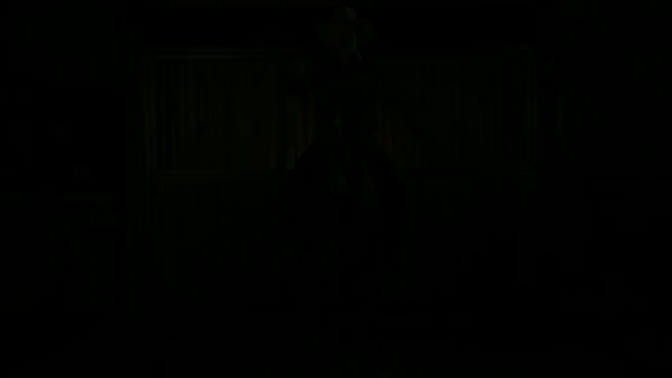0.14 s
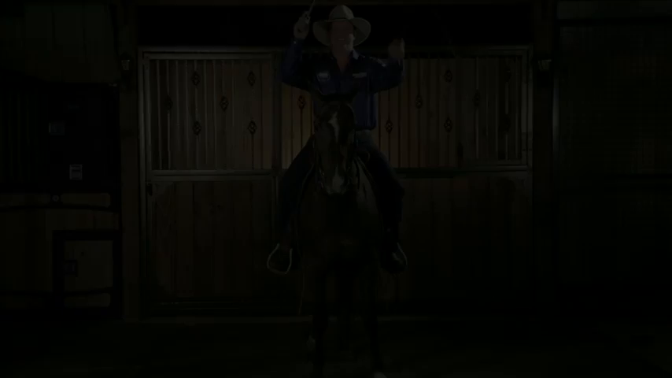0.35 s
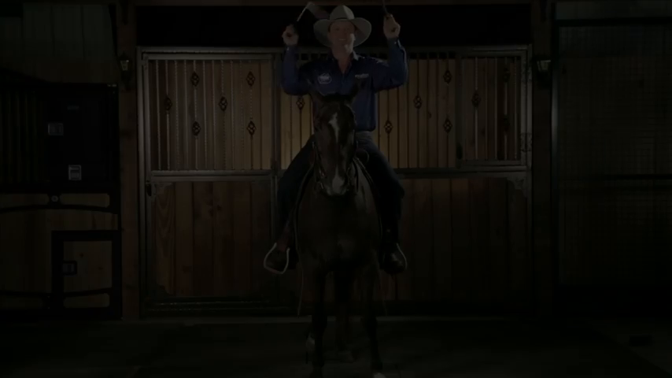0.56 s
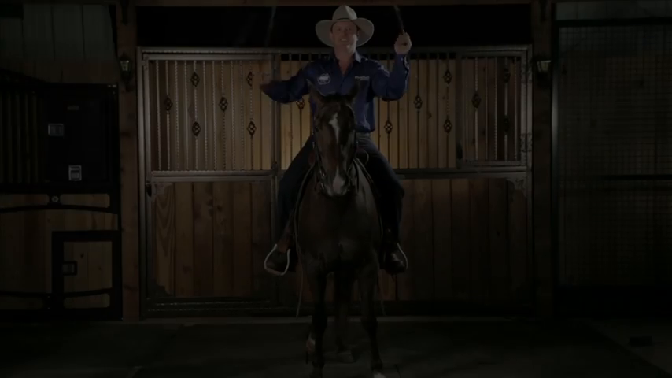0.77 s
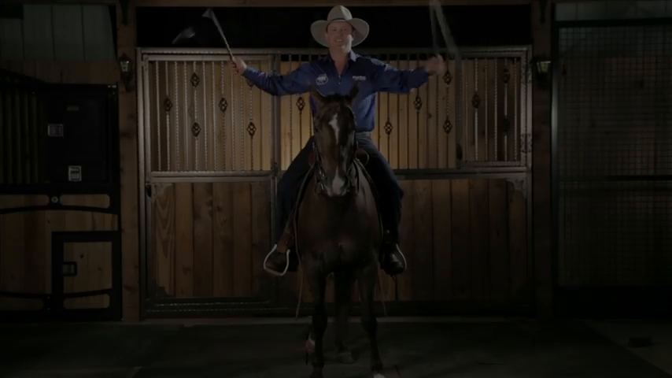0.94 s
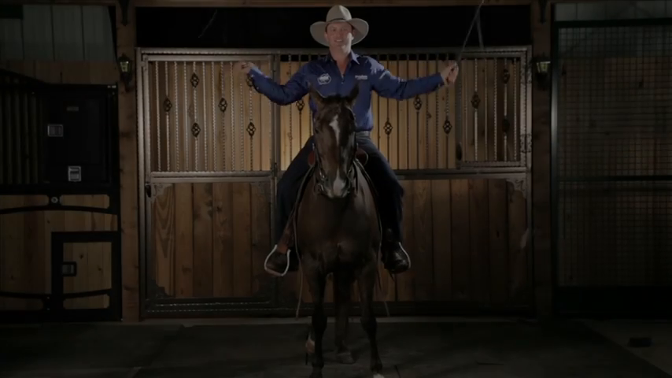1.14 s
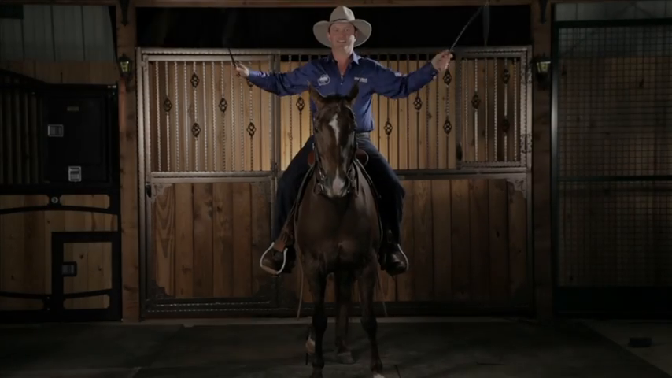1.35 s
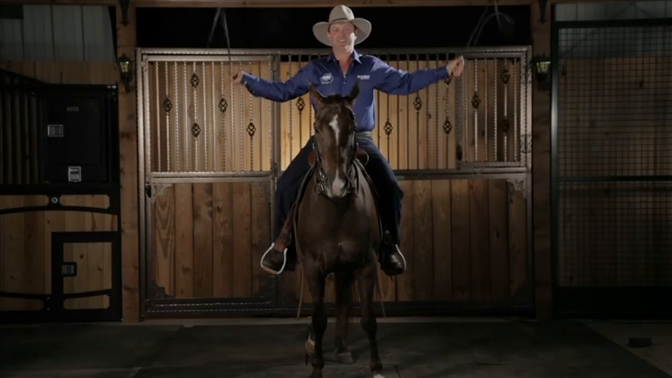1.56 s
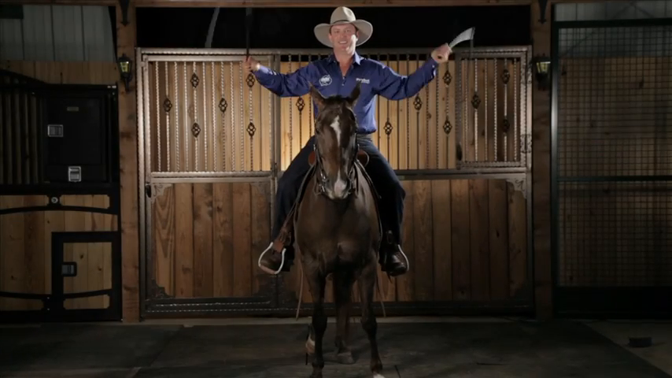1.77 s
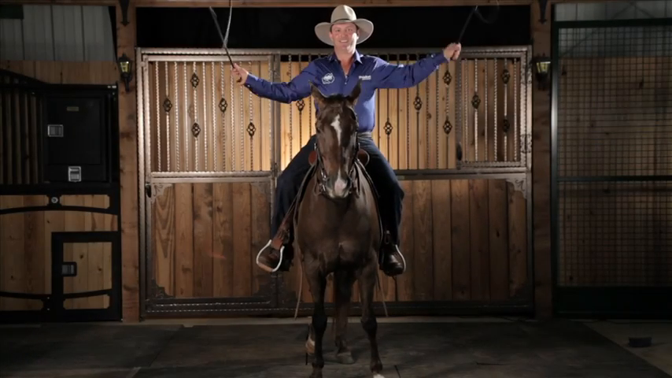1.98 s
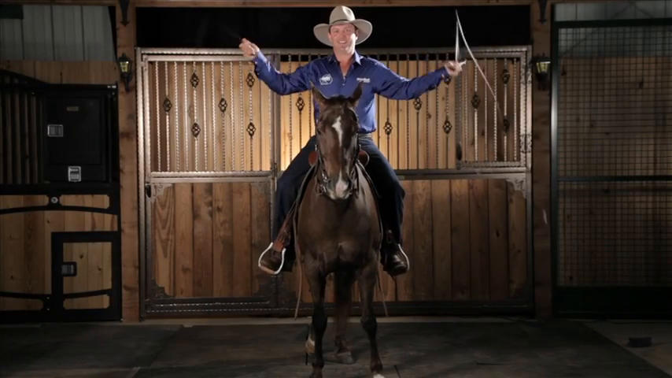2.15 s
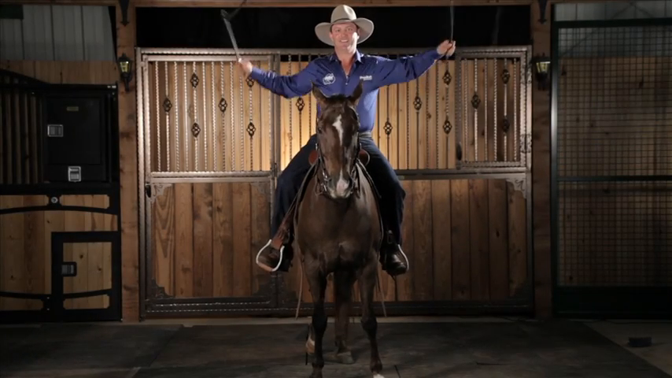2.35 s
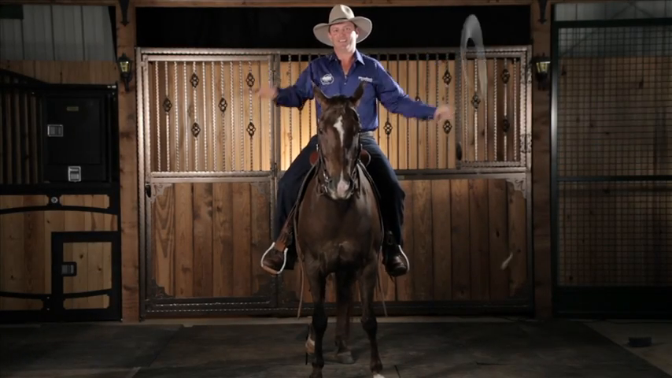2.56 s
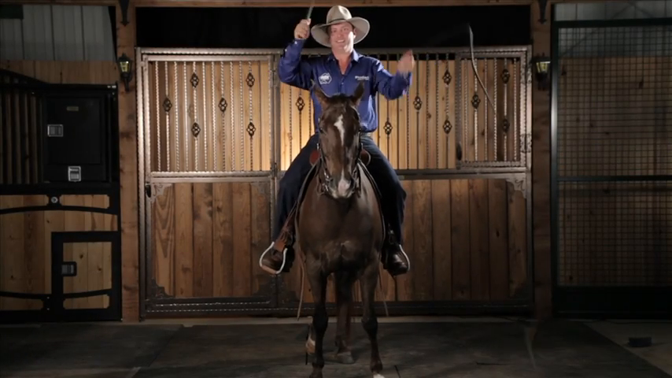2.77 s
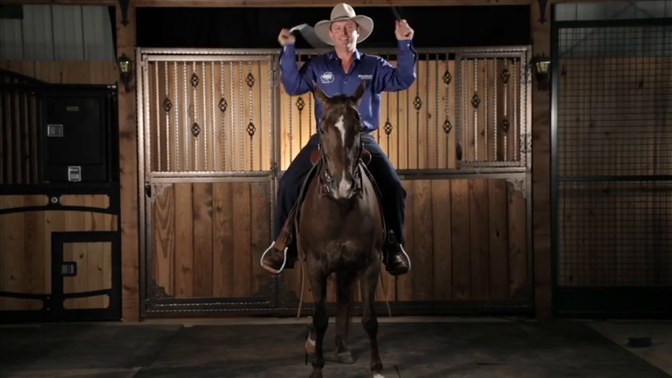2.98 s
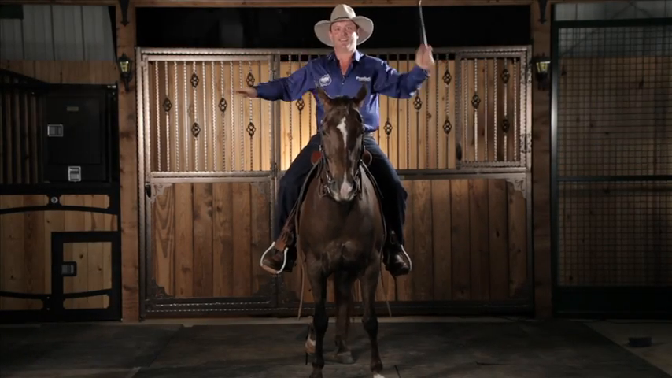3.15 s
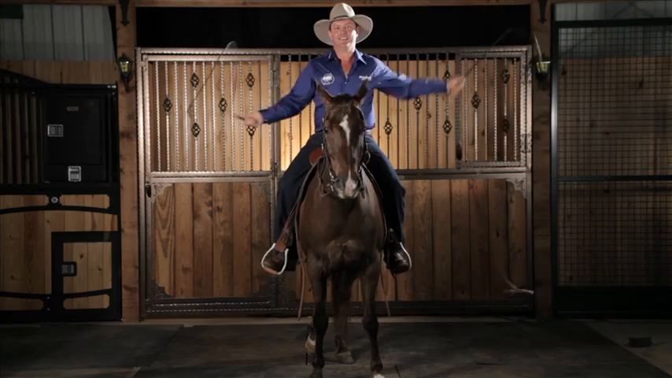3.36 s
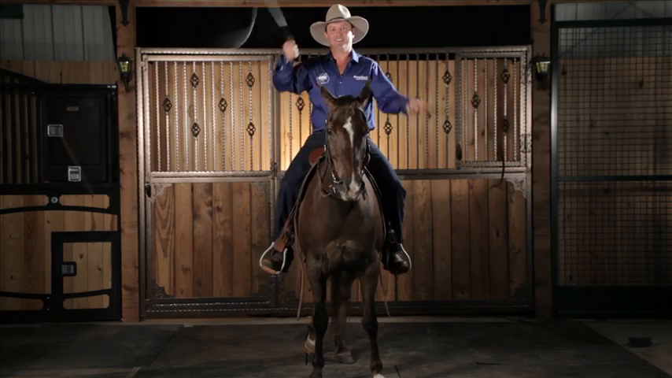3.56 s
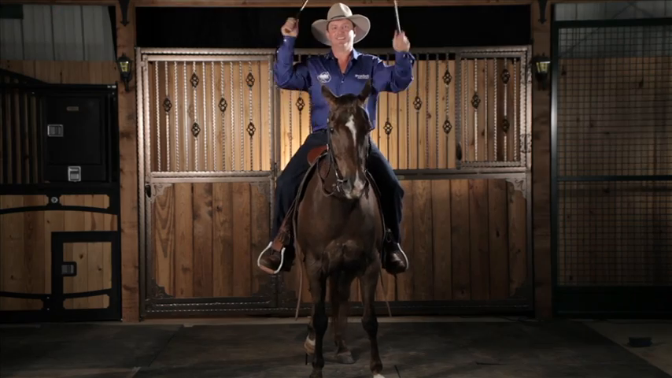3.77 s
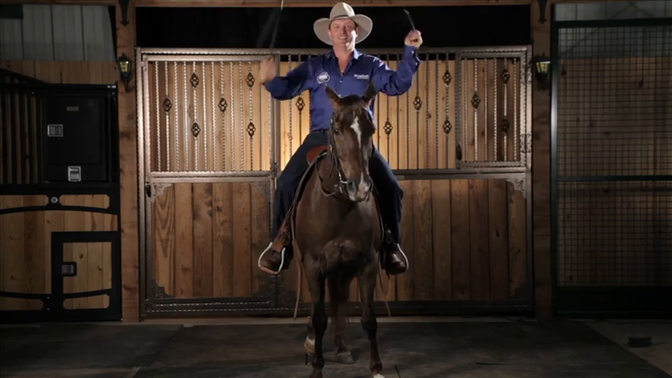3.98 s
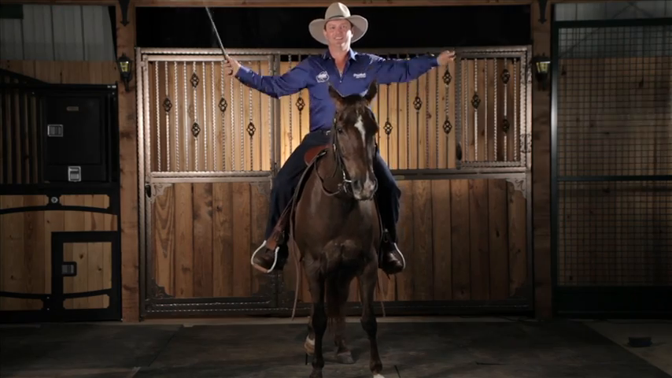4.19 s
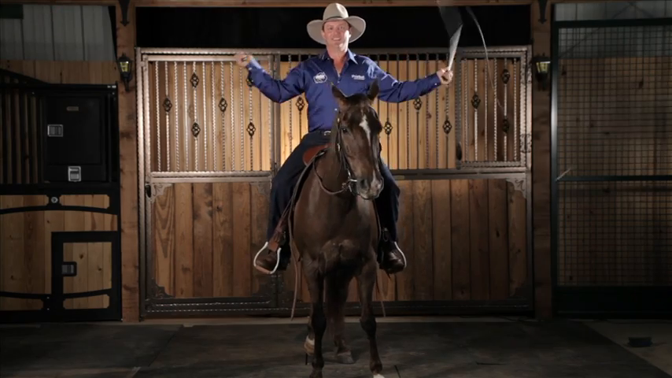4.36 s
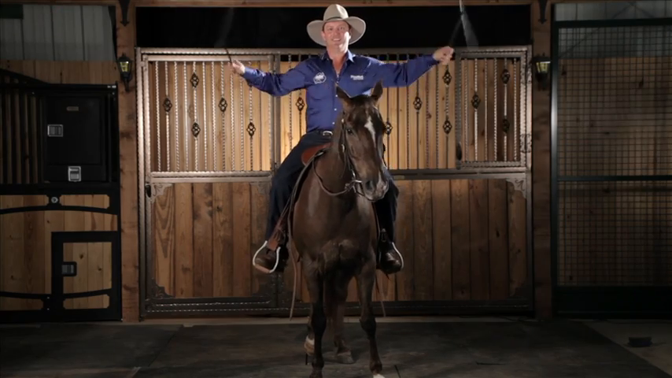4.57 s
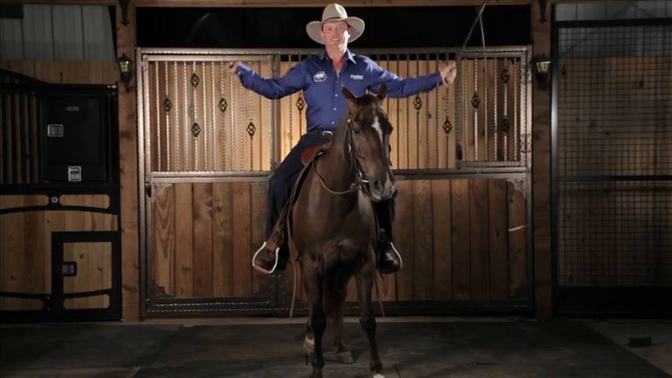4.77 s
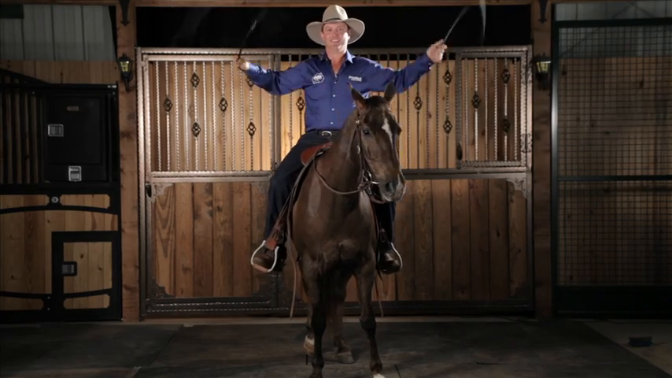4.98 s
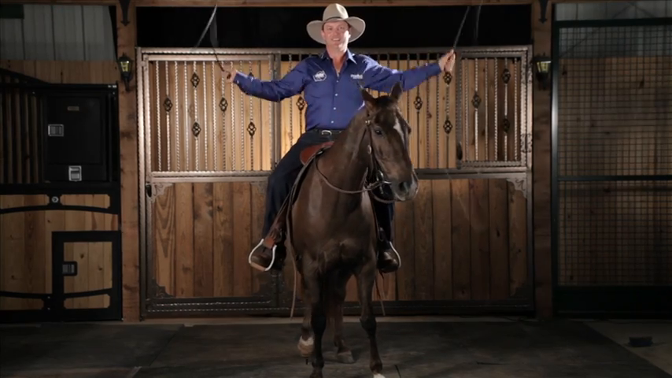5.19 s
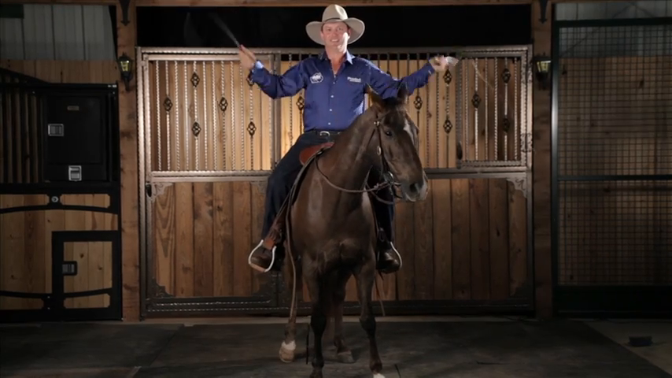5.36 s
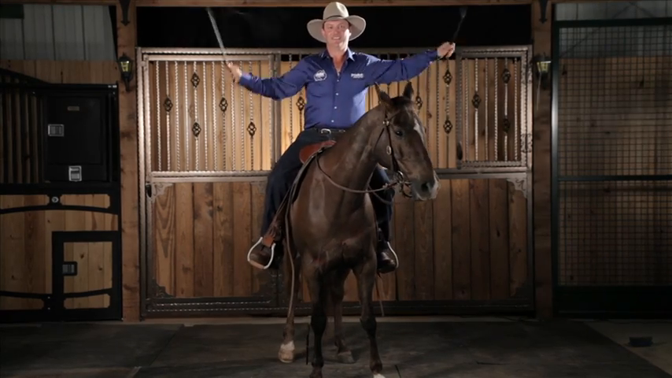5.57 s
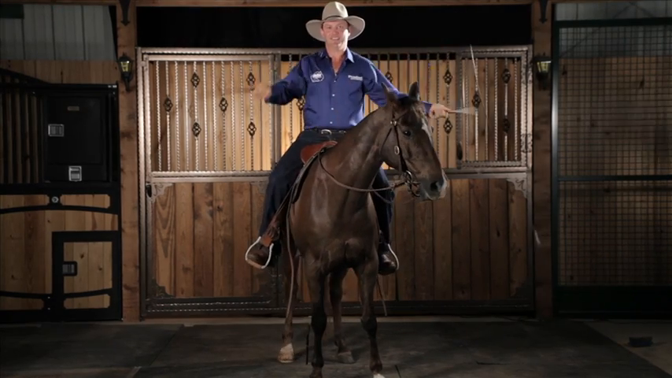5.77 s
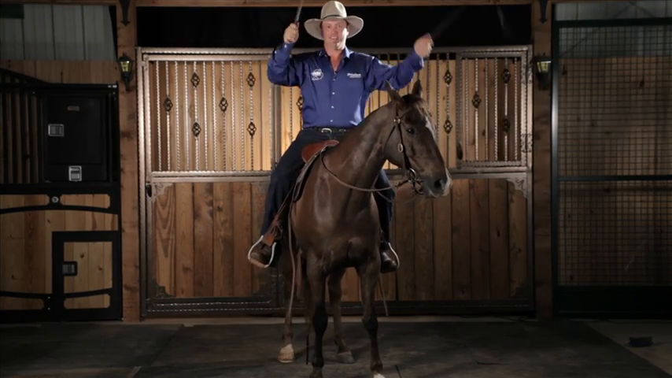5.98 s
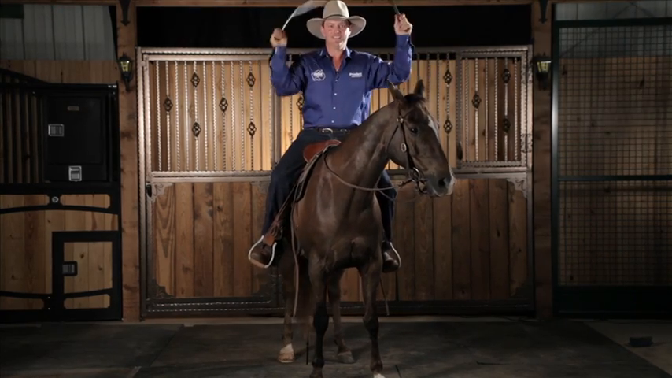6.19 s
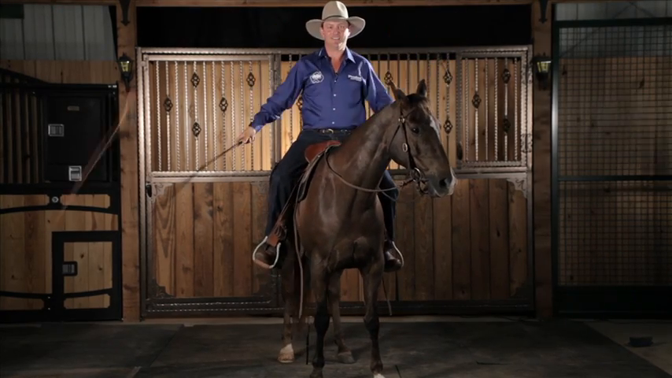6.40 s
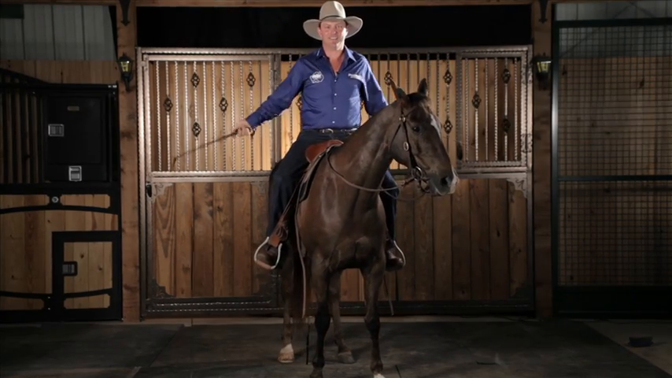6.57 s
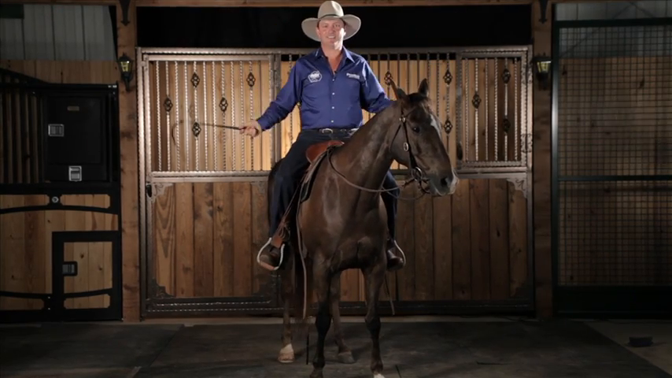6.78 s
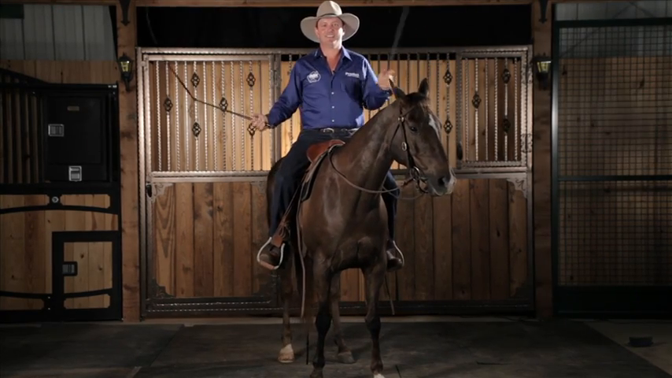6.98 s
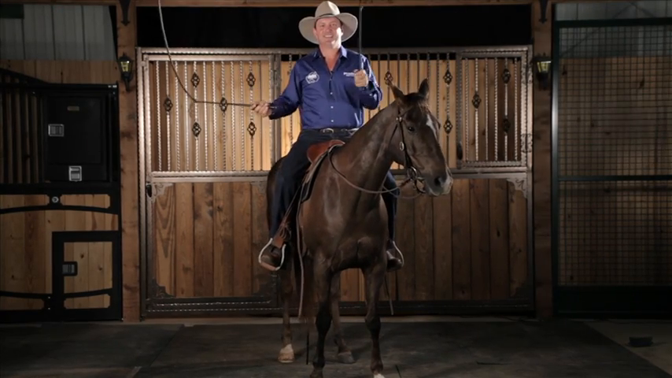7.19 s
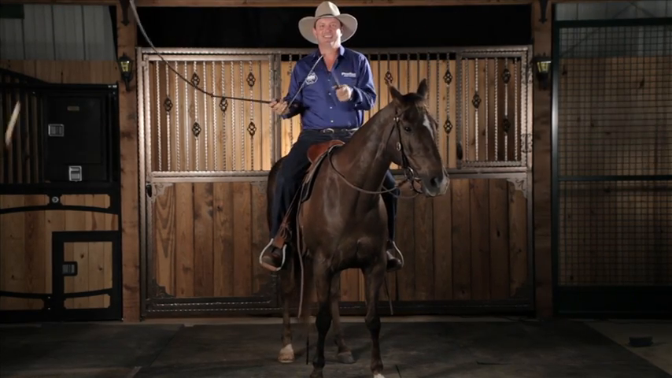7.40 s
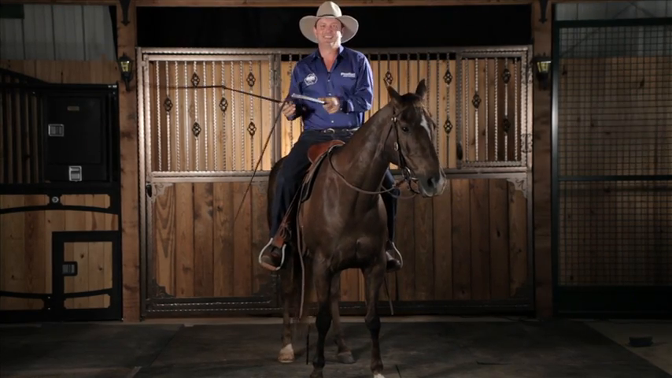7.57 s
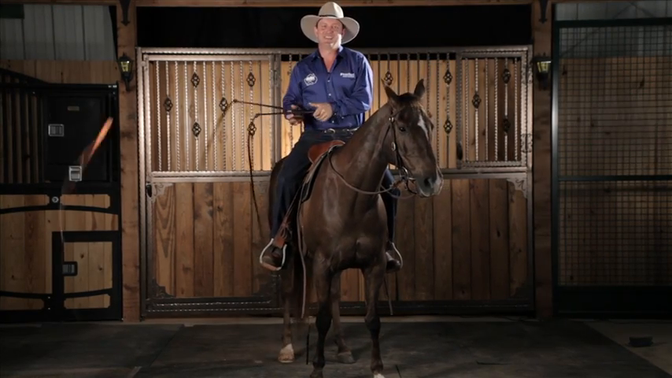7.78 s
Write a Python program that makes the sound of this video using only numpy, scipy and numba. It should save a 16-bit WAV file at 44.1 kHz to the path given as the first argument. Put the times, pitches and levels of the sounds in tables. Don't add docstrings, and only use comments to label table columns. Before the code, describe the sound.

A close microphone on a rider's shirt inside a wooden barn. From 0 to 0.9 s only quiet cloth rustle, tiny ticks and brief leather creaks near 0.3 and 0.5 s, then a short rising swish. At 0.95 s the first whip crack starts a flurry of uneven, sharp snaps, roughly eight a second, until 2.65 s. Each gets a hard slap off the near wall and about a second of bright, dense plank ringing, overlapping the next. The ringing fades; a swish rises into four cracks from 3.25 to 3.6 s, the second hugely loud. Another swish leads to a longer flurry from 4.16 to 5.9 s, loudest early. After a gap, a longer, lower swish ends in a tight burst at 6.47-6.6 s with a heavy shirt bump. The barn tail dies away; faint rubbing, bumps and dry ticks remain until about 7.8 s.

```python
import sys
import numpy as np
from scipy import signal
from scipy.fft import rfft, irfft
from scipy.io import wavfile
from scipy.ndimage import uniform_filter1d, map_coordinates
from numba import njit

SR = 44100
rng = np.random.default_rng(int(sys.argv[2]) if len(sys.argv) > 2 else 0)


def decibels_to_gain(level_db):
    exponent = np.asarray(level_db, float) / 20
    return 10 ** exponent


def to_wav(s):
    ch = np.atleast_2d(s).T
    pcm = np.round(np.clip(ch, -1, 1) * 32767)
    wavfile.write(sys.argv[1], SR, pcm.astype(np.int16))


N = 345741

# time_s, level_db
ARM_MOVEMENT = [(0, -56.5), (.87, -51.5), (1.4, -39), (2.6, -51), (3.16, -48.5), (3.75, -69), (4.04, -50),
                (4.8, -53), (5.6, -40), (6.08, -63), (6.38, -42), (6.9, -60), (7.3, -51), (7.47, -57.5),
                (7.52, -61), (7.84, -60.5)]
# start_s, length_s, level_db
RUSTLES = [(0, 0.032, -62), (.06, 0.11, -66), (0.192, 0.094, -65.5), (0.304, 0.072, -46.5),
           (0.41, 0.071, -47), (0.505, 0.1, -42.5), (.66, 0.043, -46.5), (0.746, 0.018, -60),
           (7.189, 0.24, -60), (7.61, 0.041, -66), (7.784, 0.0054, -65)]
# frequency_hz, density_db
RUB_COLOUR = [(15, -20.5), (40, -21.5), (65, -12.5), (95, 1), (143, 5.5), (415, -0.5), (1500, -13.5),
              (3300, -59.5)]
# frequency_hz, density_db
WEAVE_COLOUR = [(120, -38.5), (200, -6.5), (419, 1.5), (2020, -7.5), (2550, -9), (2850, -11), (3670, -15),
                (15000, -25)]
# start_s, peak_db, pitch_hz
BUMPS = [(.245, -44, 170), (0.321, -43, 151), (.662, -40, 170), (.945, -20, 203), (7.215, -38, 110),
         (1.436, -19, 195), (1.91, -22, 200), (3.14, -51, 132), (3.239, -20, 247), (4.114, -28, 320),
         (4.137, -25, 130), (4.627, -33, 113), (6.335, -35, 338), (6.348, -28, 132), (6.454, -31, 117),
         (6.47, -8, 119), (6.87, -29, 150), (7.206, -35, 122)]
# start_s, peak_db, pitch_hz
TICKS = [(0.1744, -43, 2410), (0.2374, -45, 1600), (0.2564, -39, 1750), (0.2897, -47, 1690),
         (0.3324, -40, 1990), (0.405, -38, 1910), (0.4364, -28, 1950), (0.4814, -42, 1710),
         (0.552, -39, 1900), (0.7871, -29, 1620), (0.8454, -40, 1600), (4.1114, -41, 2490),
         (7.5844, -48, 2360), (7.657, -29, 6000), (7.678, -47, 2470), (7.465, -44, 5000),
         (7.791, -40, 3500)]
# start_s, peak_db, width_s
THREADS = [
    (.405, -43, .0001),
    (.7871, -40, .0001),
    (7.7312, -42, .00006),
    (7.769, -38, .0001),
    (7.802, -42, .00015),
]
# start_s, level_db, pitch_hz, length_s
CREAKS = [
    (.306, -45, 1000, .005),
    (.307, -47, 2500, .02),
    (.503, -43, 1300, .006),
    (.508, -42, 2850, .018),
    (.511, -43, 2050, .018),
    (.543, -40, 1200, .01),
]
# crack_s, length_s, swish_db, top_pitch_hz, rustle_db
WINDUPS = [
    (0.948, 0.15, -47.5, 1300, -29.5),
    (3.243, 0.18, -42, 1170, -35),
    (4.154, .175, -44.5, 1240, -35.5),
    (6.467, 0.25, -50.5, 920, -38),
]
# offset_hz, density_db
EDDY_COLOUR = [(150, 1), (400, -8.5), (2000, -28.5), (9000, -51.0)]
# crack_s, snap_peak_db, barn_db, strongest_band_hz
WHIP_CRACKS = [ (0.948, -13.5, -18, 4060), (1.1104, -14, -13.5, 3520), (1.3529, -17, -16, 3950),
               (1.4395, -16, -30, 2430), (1.5695, -9, -13.5, 3120), (1.694, -12, -17.5, 3800),
               (1.8150, -20, -17.5, 4860), (1.9127, -14.5, -27, 3000), (2.019, -15.5, -13, 3540),
               (2.171, -13, -17, 3830), (2.2947, -18.5, -27.5, 4100), (2.369, -18, -21.5, 4000),
               (2.4734, -16.5, -20, 3560), (2.608, -6.5, -13.5, 2860), (2.655, -28, -19.5, 5950),
               (3.2473, -8, -16, 3470), (3.3555, -1, -6.5, 2940), (3.4697, -12, -15, 4530),
               (3.5964, -14, -19.5, 3600),
               (4.1590, -9.5, -14.5, 3220), (4.2765, -3, -11, 3240), (4.5150, -17, -17.5, 4200),
                  (4.6270, -14, -25, 2980), (4.7313, -7, -17.5, 3100), (4.8812, -15.5, -22.5, 3030),
                  (4.9753, -16, -19, 3650), (5.0964, -17.5, -34.5, 2500), (5.188, -14, -17, 3690),
                  (5.3474, -17, -27.5, 2250), (5.5550, -12.5, -29, 2850), (5.6535, -15.5, -16, 3590),
                  (5.8059, -9, -16, 3120), (5.8870, -9, -16, 3440), (6.4660, -28.5, -16, 5450),
                  (6.4727, -4.5, -9, 2340), (6.5560, -26, -9.5, 2920), (6.6150, -30, -19.5, 2760)]
# frequency_hz, density_db
SNAP_COLOUR = [(60, -16.5), (300, -4.5), (1500, -5.5), (5000, -10), (12000, -23.5)]
# frequency_hz, density_db
FLOOR_COLOUR = [(1500, 13), (8000, -6.0), (15000, -26.0)]
# frequency_hz, density_db
BARN_COLOUR = [(40, -41), (100, -2), (300, -4.5), (900, -4.5), (1600, -0.5), (2400, 1.07), (3600, 0.5),
               (6000, -8.5), (10000, -14.5), (16000, -26)]
# frequency_hz, t60_s
BARN_DECAY = [(100, 0.65), (400, 0.85), (1500, 0.89), (3500, 1.034), (7000, 0.85), (13000, 0.47)]
# frequency_hz, build_s
ECHO_BUILD = [(1000, 0.00057), (3000, 0.0028), (8000, 0.0081)]
# after_first_s, extra_db, spread_s
WALL_RETURNS = [
    (.006, 4.5, 0.0053),
    (.021, -0.5, .003),
    (.042, 1, .006),
    (0.06, 1, 0.035),
    (0.108, 1, .02),
]

CRACKS = WHIP_CRACKS
PRE = 256 / SR
BARN_DELAY_S, SLAP_DELAY_S = 0.015, 0.0175
SLAP_DB, SLAP_TILT = -2, 0.21
JERK_DB, JERK_RISE_S, JERK_FALL_S = -20, 0.0099, 0.036
RUSTLE_RISE, RUSTLE_FALL, REST_DB = 730, 560, -64.5
PULL_DB, PULL_SHAPE = 25, 0.37
SLOW_HZ, SPEEDUP = 308, 1.6
FADE_IN_DB, SHARE_IN = 27, 0.48


def unit(x):
    return x / np.sqrt(np.mean(x ** 2) + 1e-20)


def along(points, hz):
    f, v = np.transpose(points)
    return np.interp(np.log(hz + 1), np.log(f + 1), v)


def level(rows):
    s, db = np.transpose(rows)
    return decibels_to_gain(np.interp(np.arange(N) / SR, s, db))


def wobble(rate):
    knots = rng.standard_normal(int(N * rate / SR) + 4)
    return map_coordinates(knots, [np.arange(N) * rate / SR])


def noise(colour, size):
    hz = np.fft.rfftfreq(size, 1 / SR)
    return unit(irfft(rfft(rng.standard_normal(size)) * decibels_to_gain(along(colour, hz)), size))


def add(track, s, x):
    part = track[round(s * SR):][:len(x)]
    part += x[:len(part)]


def progress(end_s, length_s):
    u = 1 + (np.arange(N) / SR - end_s) / length_s
    return np.clip(u, 0, 1), u <= 1


def shirt():
    t = np.arange(N) / SR
    sleeve = level(ARM_MOVEMENT)
    jerk = (1 - np.exp(-t[:SR] / JERK_RISE_S)) * np.exp(-t[:SR] / JERK_FALL_S)
    for s, _, barn_db, _ in CRACKS:
        add(sleeve, s, decibels_to_gain(barn_db + JERK_DB) * jerk)

    cloth = decibels_to_gain(REST_DB)
    for s, length, db in RUSTLES:
        rise_db = RUSTLE_RISE * np.maximum(s - t, 0)
        fall_db = RUSTLE_FALL * np.maximum(t - s - length, 0)
        cloth = cloth + decibels_to_gain(db - rise_db - fall_db)
    for s, length, _, _, db in WINDUPS:
        u, on = progress(s, length)
        rise_db = RUSTLE_RISE * np.maximum(s - length - t, 0)
        cloth = cloth + on * decibels_to_gain(db - PULL_DB * (1 - u) ** PULL_SHAPE - rise_db)

    rub = sleeve * unit(decibels_to_gain(2.5 * wobble(25)) * noise(RUB_COLOUR, N))
    grain = decibels_to_gain(1.2 * wobble(30) + 2.2 * wobble(400))
    rustle = cloth * unit(grain * noise(WEAVE_COLOUR, N))
    return decibels_to_gain(1.0) * rub + decibels_to_gain(-1.5) * rustle


def capsule_and_tack():
    track, t = np.zeros(N), np.arange(2048) / SR
    for s, db, hz in BUMPS:
        add(track, s, decibels_to_gain(db) * -np.sin(2 * np.pi * hz * t) * np.exp(-(hz * t / 0.68 - 1.1) ** 2))
    for s, db, hz in TICKS:
        puff = noise([(hz / 4, -10), (hz, 0), (hz * 3, -9), (hz * 8, -14)], 2048)
        add(track, s, decibels_to_gain(db - 12.5) * puff * np.exp(-t / 0.0011))
    for s, db, width in THREADS:
        add(track, s, decibels_to_gain(db) * np.exp(-t / width))
    for s, db, hz, length in CREAKS:
        slips = noise([(hz / 2, -50), (hz * .85, -14), (hz, 0), (hz * 1.15, -16), (hz * 2, -60)], 2048)
        add(track, s, decibels_to_gain(db) * slips * np.exp(-(2 * t / length - 1) ** 4))
    return track


def swish():
    air = 0
    for s, length, db, top_hz, _ in WINDUPS:
        u, on = progress(s, length)
        pitch_hz = SLOW_HZ * (top_hz / SLOW_HZ) ** (u ** SPEEDUP)
        phase = 2 * np.pi * np.cumsum(pitch_hz) / SR
        swell = on * (u > 0) * decibels_to_gain(db - FADE_IN_DB * np.maximum(1 - u / SHARE_IN, 0))
        eddies = np.cos(phase) * noise(EDDY_COLOUR, N) + np.sin(phase) * noise(EDDY_COLOUR, N)
        air = air + swell * eddies
    return air


def barn_answer(hump_hz):
    hz, t, z = signal.stft(rng.standard_normal(65536), SR, nperseg=256, noverlap=192)
    colour_db = along(BARN_COLOUR, hz * (3000 / hump_hz) ** np.clip(hz / 1500, 0, 1))
    colour = decibels_to_gain(colour_db) / np.sqrt(np.mean(decibels_to_gain(2 * colour_db)))
    patches = uniform_filter1d(rng.standard_normal(z.shape), size=7, axis=0)
    patches = uniform_filter1d(patches, size=14, axis=1)
    swell = 1 - np.exp(-t / np.abs(along(ECHO_BUILD, hz))[:, None])
    fade_db = 1.27 * unit(patches) - 60 * t / along(BARN_DECAY, hz)[:, None]
    echoes = z * colour[:, None] * swell * decibels_to_gain(fade_db)
    tail = signal.istft(echoes, SR, nperseg=256, noverlap=192)[1]

    t = np.arange(len(tail)) / SR
    returns_db = sum(db * np.exp(-((t - s) / spread) ** 2) for s, db, spread in WALL_RETURNS)
    return tail * decibels_to_gain(returns_db) * (1 - np.exp(-t / 0.00029))


def blast(t, width_ms):
    u = t / (width_ms / 1000)
    push = 0.6 * np.exp(-((u - 2.3) / 1.6) ** 2) + 0.3 * np.exp(-(u + 1.8) ** 2)
    suction = 1.2 * np.exp(-u ** 2)
    swing_back = 0.2 * np.exp(-((u - 8) / 3.5) ** 2)
    return push - suction - swing_back


def snap(width_ms):
    t = np.arange(2048) / SR - PRE
    whistle_hz = 6000 * np.exp(np.minimum(t, 0) / 0.0065)
    whistle = np.sin(2 * np.pi * np.cumsum(whistle_hz) / SR + rng.uniform(0, 8.7))
    lead = 0.11 * np.exp(-(t / 0.0035 + 0.6) ** 2) * (t < 0)
    puff = 0.22 * np.exp(-(t / 0.0018) ** 2) + 0.13 * np.exp(-np.maximum(t, -5 * t) / 0.012)
    floor = 0.2 * np.exp(-((t - 0.012) / 0.0025) ** 2) * noise(FLOOR_COLOUR, 2048)
    return blast(t, width_ms) + lead * whistle + puff * noise(SNAP_COLOUR, 2048) + floor


def whips():
    track = np.zeros(N)
    for s, snap_db, barn_db, hump_hz in CRACKS:
        width_ms = np.clip(0.17 - 0.008 * (barn_db + 12), 0.12, 0.5)
        slap_db = snap_db + SLAP_DB - SLAP_TILT * (barn_db + 16)
        add(track, s - PRE, decibels_to_gain(snap_db) * snap(width_ms))
        add(track, s - PRE + SLAP_DELAY_S, decibels_to_gain(slap_db) * snap(0.7 * width_ms))
        add(track, s + BARN_DELAY_S, decibels_to_gain(barn_db) * barn_answer(hump_hz))
    return track


def scene():
    highpass = signal.butter(3, 85, "highpass", fs=SR, output="sos")
    cracks = signal.sosfilt(highpass, whips())
    mono = cracks + swish() + shirt() + capsule_and_tack()
    return np.array([mono, mono])


@njit
def follow(x, rise, fall):
    out, held = np.empty_like(x), 0.0
    for i in range(len(x)):
        held += (rise if x[i] > held else fall) * (x[i] - held)
        out[i] = held
    return out


def roll_off(x):
    return signal.sosfilt(signal.butter(12, 16480, fs=SR, output="sos"), x)


def record(dry):
    loud = follow(np.abs(dry[0]), 1 / (0.00048 * SR), 1 / (0.06 * SR))
    squeezed = dry / (1 + (loud / decibels_to_gain(-10.5)) ** 3) ** (0.43 / 3)
    rounded = squeezed / (1 + np.abs(squeezed / 0.78) ** 6) ** (1 / 6)
    hz = np.fft.rfftfreq(N, 1 / SR)
    banded = irfft(rfft(rounded) * np.clip((15350 - hz) / 250, 0.003, 1), N)
    return roll_off(banded)


dry = scene()
out = record(dry)
to_wav(out)
```